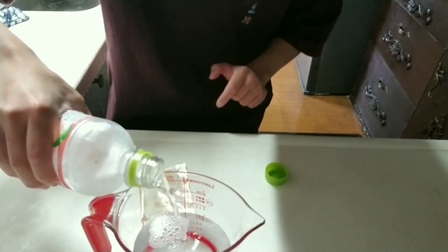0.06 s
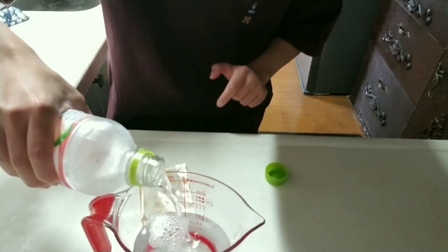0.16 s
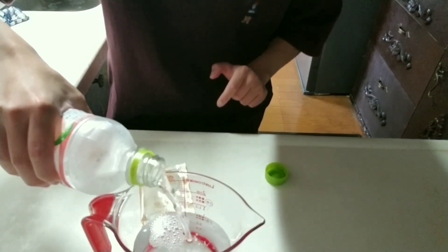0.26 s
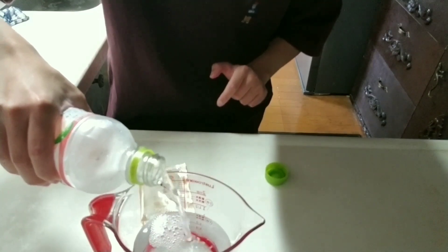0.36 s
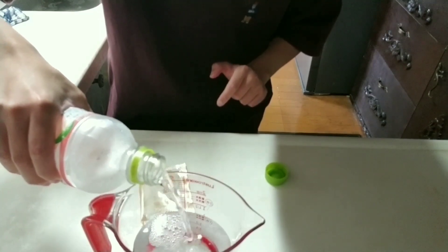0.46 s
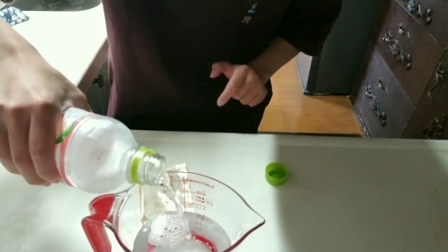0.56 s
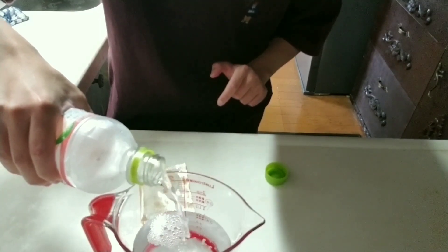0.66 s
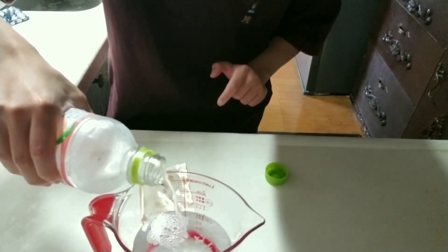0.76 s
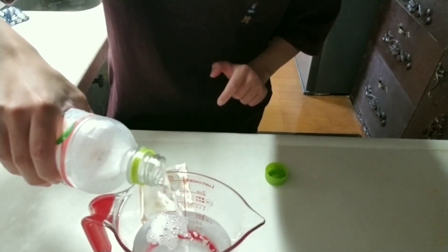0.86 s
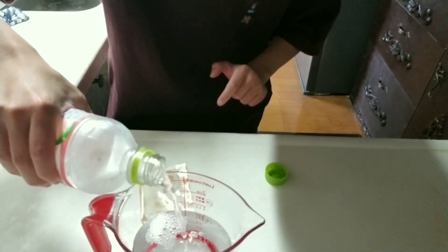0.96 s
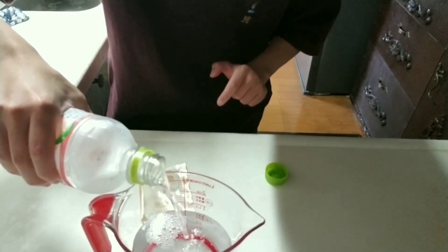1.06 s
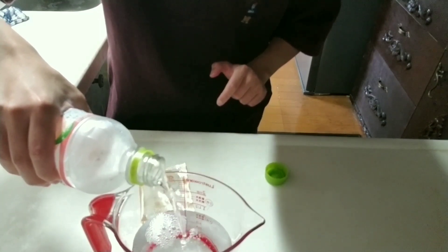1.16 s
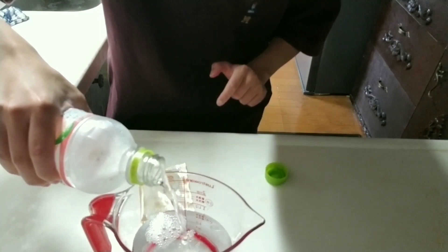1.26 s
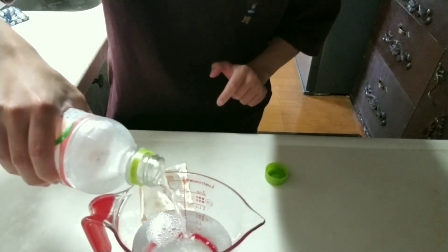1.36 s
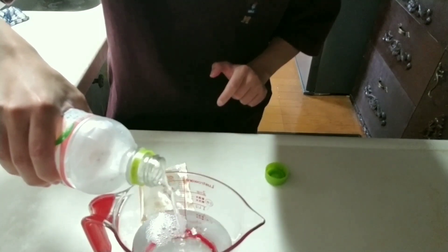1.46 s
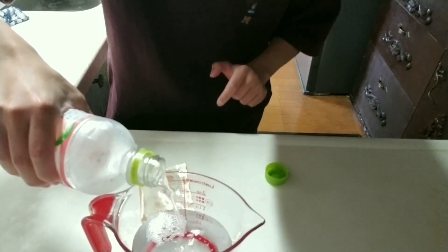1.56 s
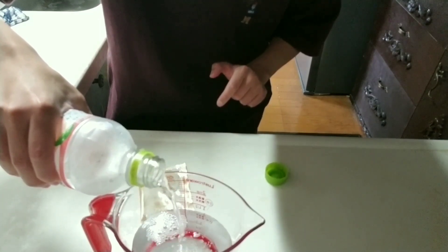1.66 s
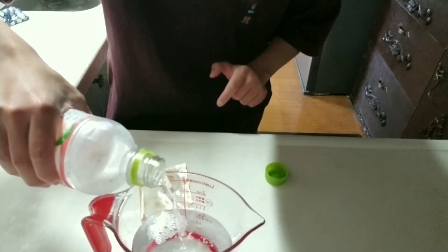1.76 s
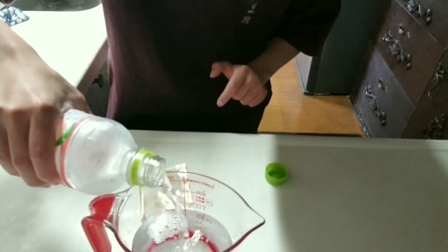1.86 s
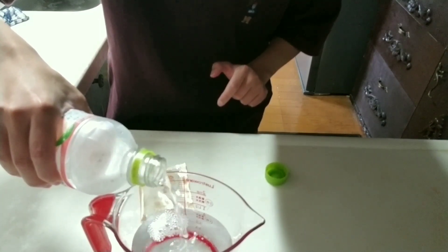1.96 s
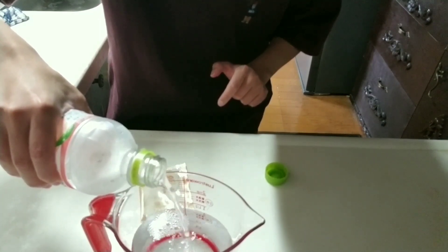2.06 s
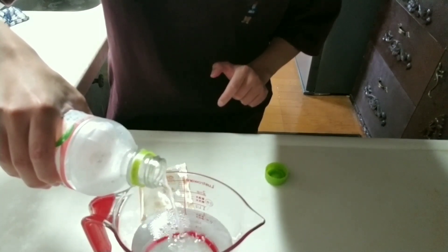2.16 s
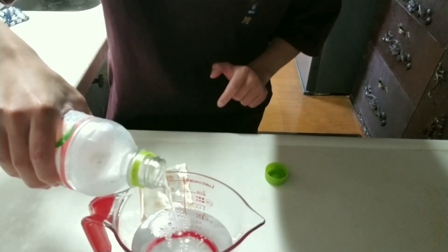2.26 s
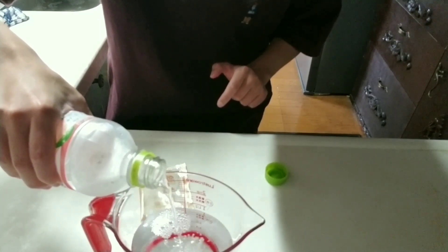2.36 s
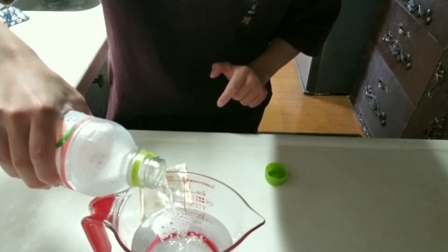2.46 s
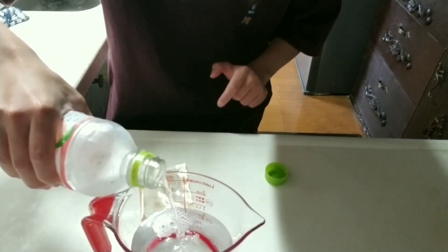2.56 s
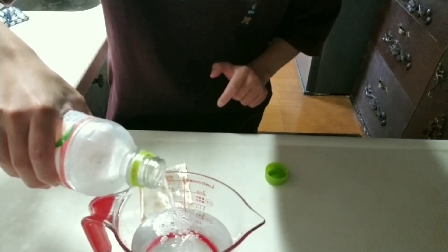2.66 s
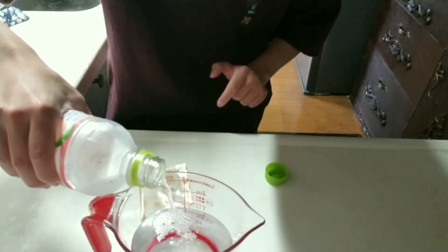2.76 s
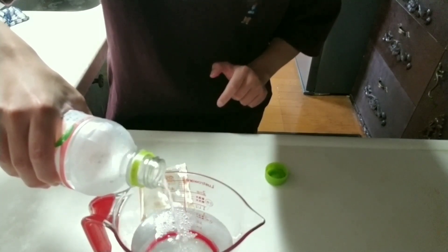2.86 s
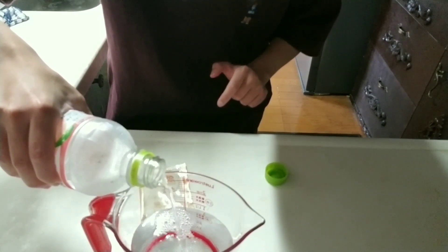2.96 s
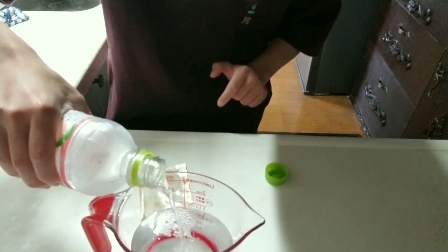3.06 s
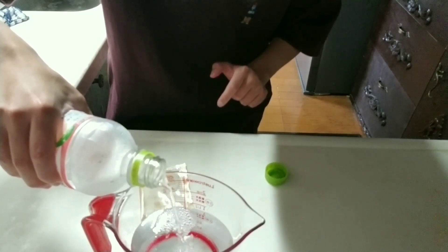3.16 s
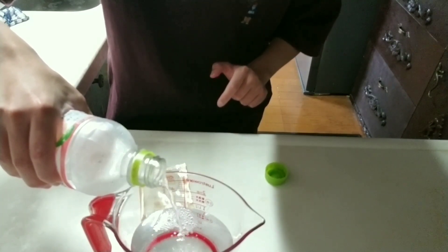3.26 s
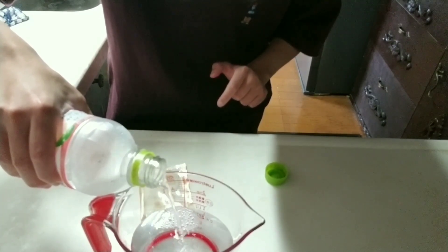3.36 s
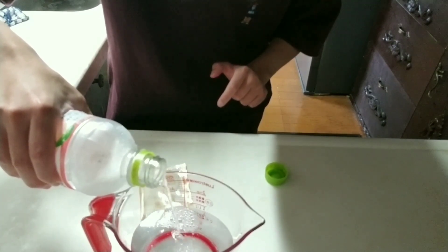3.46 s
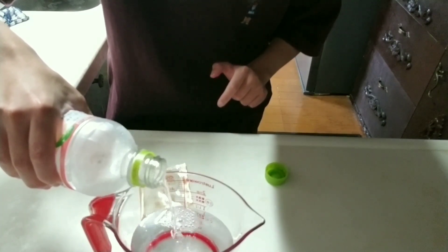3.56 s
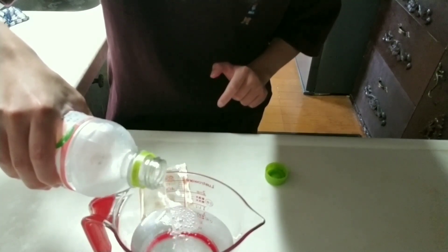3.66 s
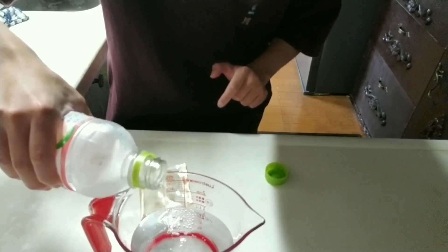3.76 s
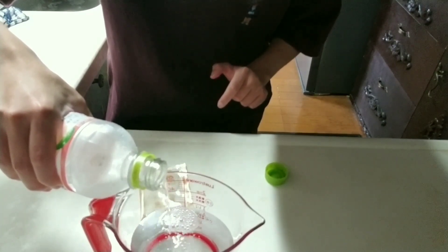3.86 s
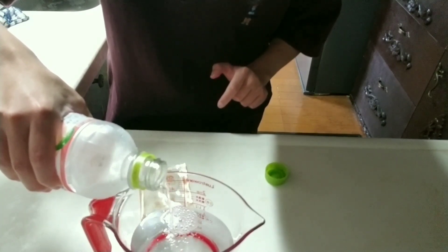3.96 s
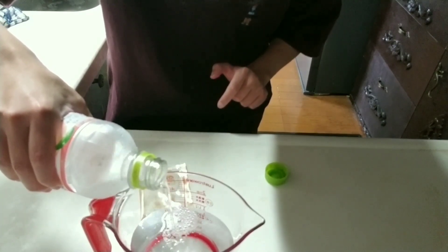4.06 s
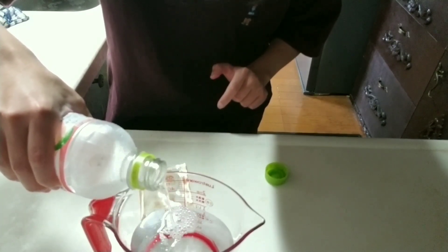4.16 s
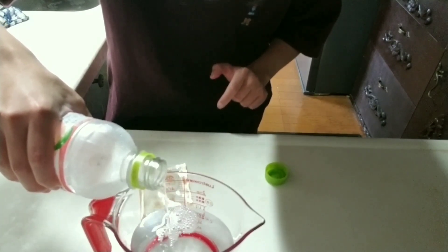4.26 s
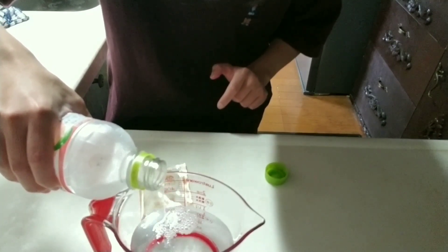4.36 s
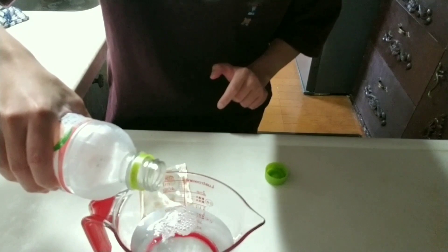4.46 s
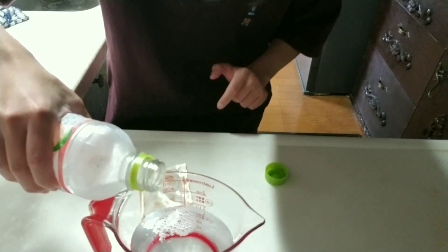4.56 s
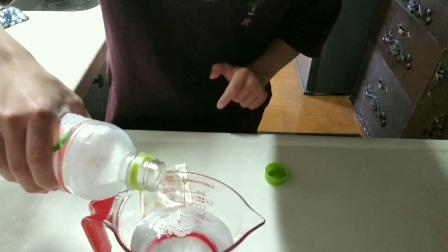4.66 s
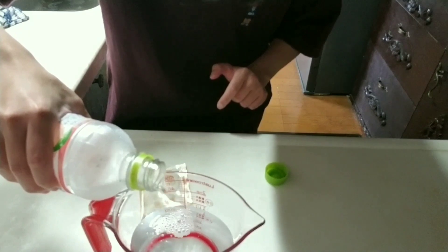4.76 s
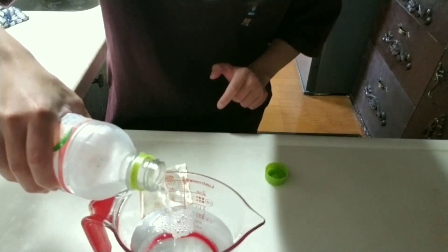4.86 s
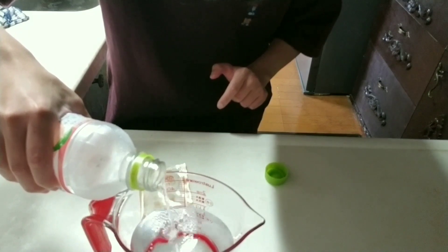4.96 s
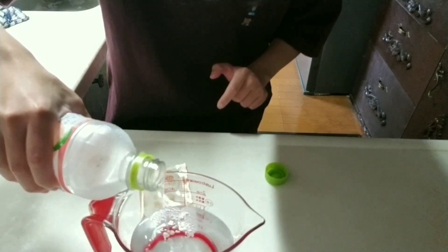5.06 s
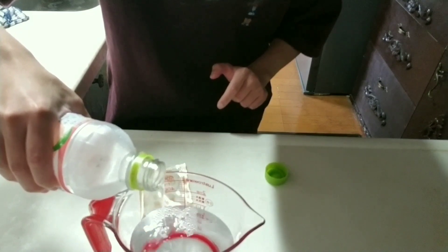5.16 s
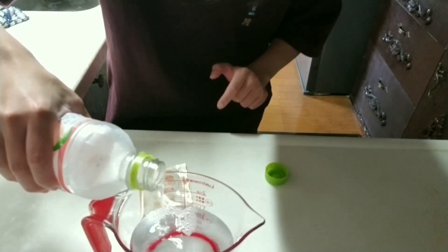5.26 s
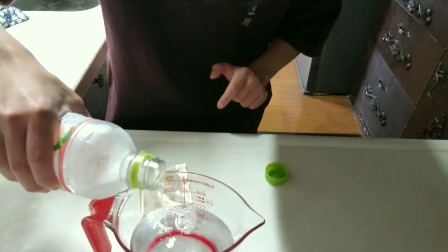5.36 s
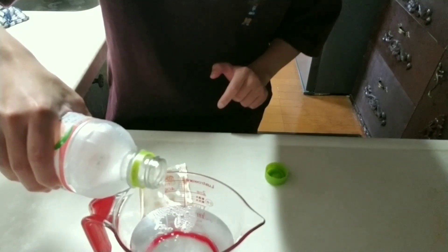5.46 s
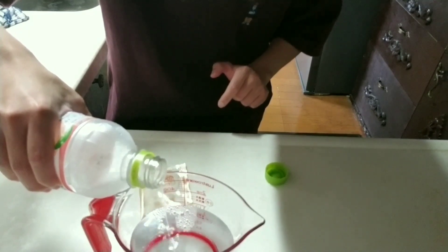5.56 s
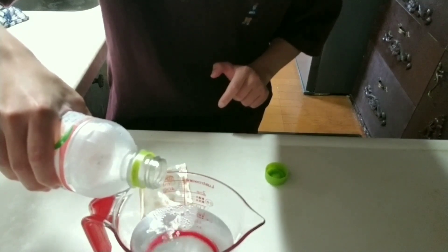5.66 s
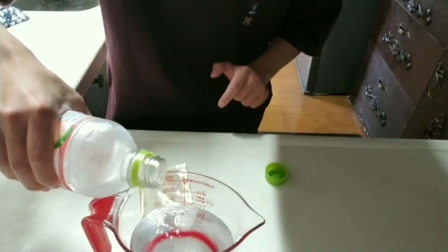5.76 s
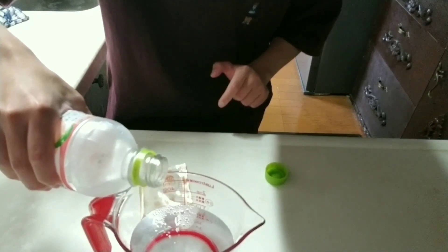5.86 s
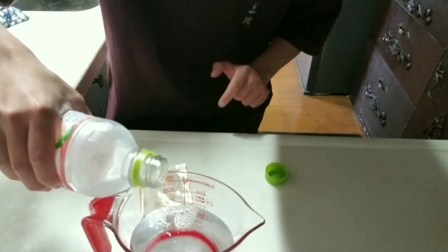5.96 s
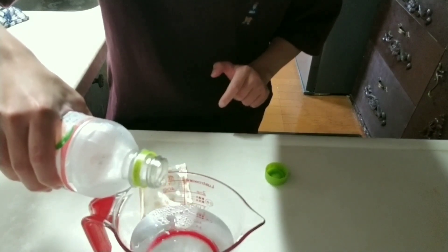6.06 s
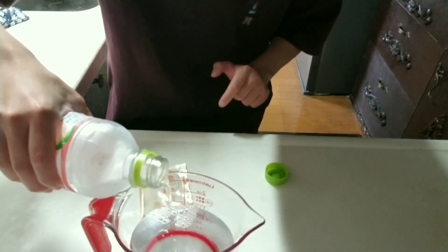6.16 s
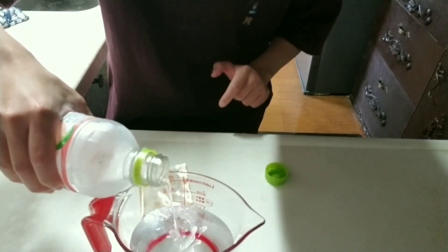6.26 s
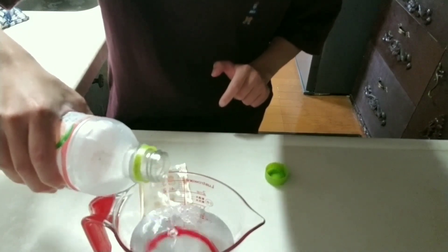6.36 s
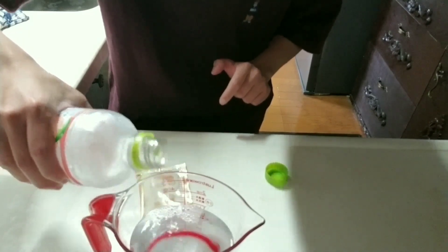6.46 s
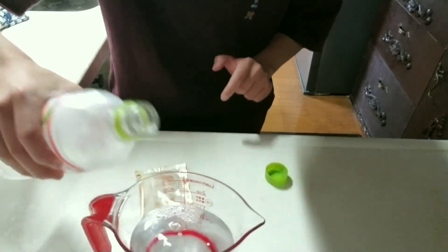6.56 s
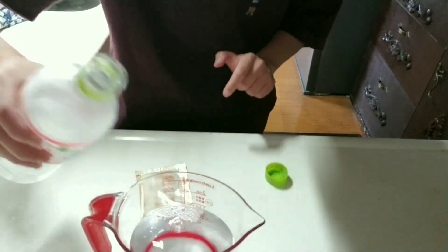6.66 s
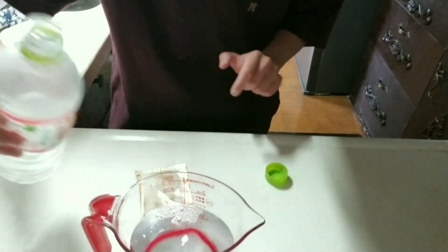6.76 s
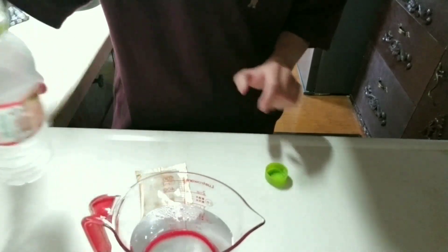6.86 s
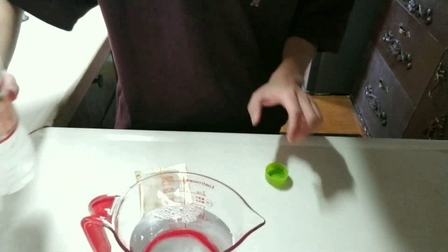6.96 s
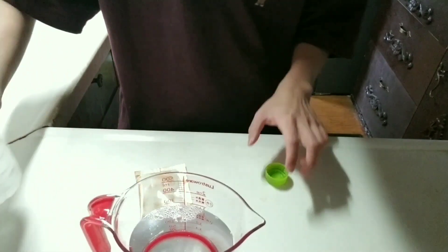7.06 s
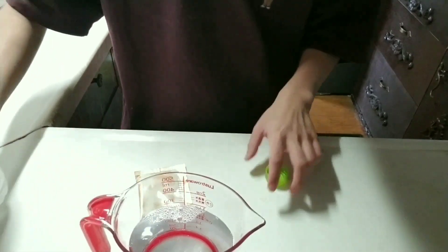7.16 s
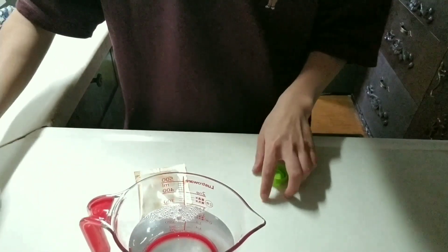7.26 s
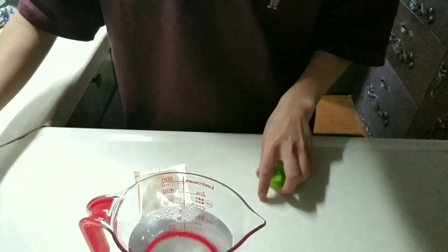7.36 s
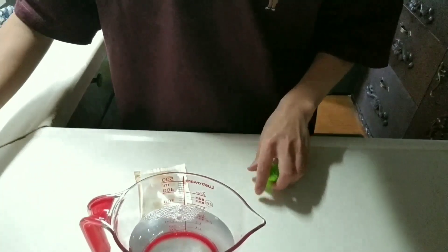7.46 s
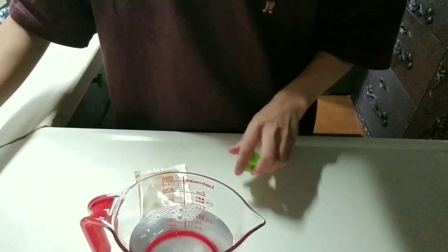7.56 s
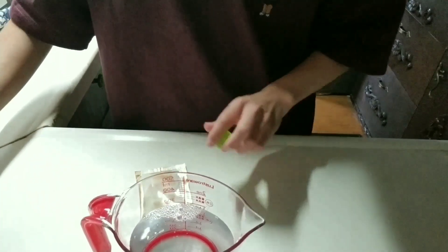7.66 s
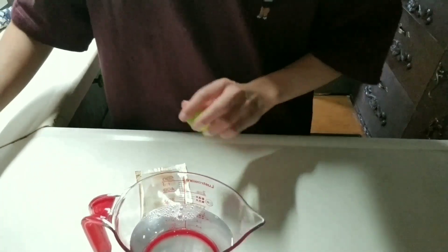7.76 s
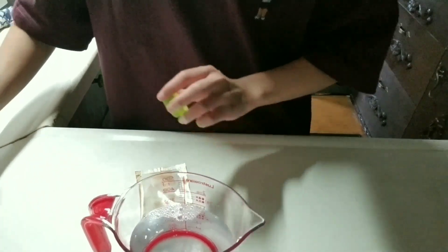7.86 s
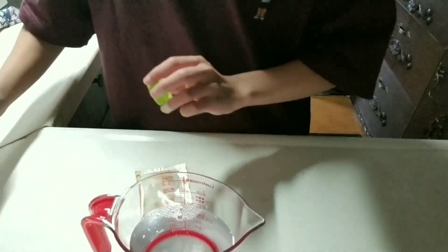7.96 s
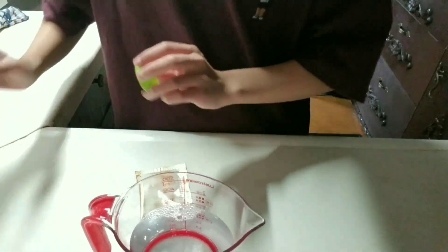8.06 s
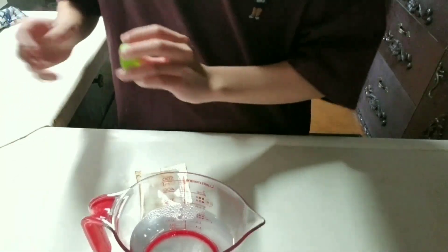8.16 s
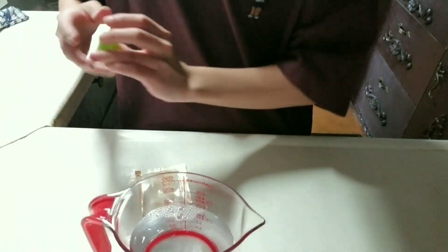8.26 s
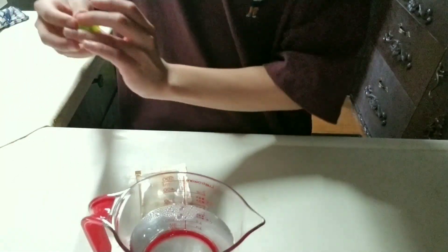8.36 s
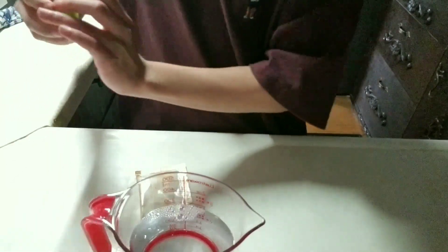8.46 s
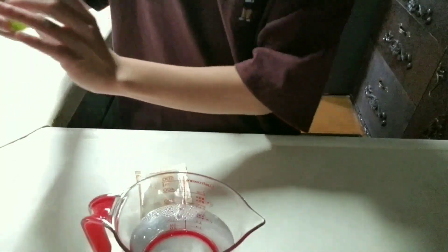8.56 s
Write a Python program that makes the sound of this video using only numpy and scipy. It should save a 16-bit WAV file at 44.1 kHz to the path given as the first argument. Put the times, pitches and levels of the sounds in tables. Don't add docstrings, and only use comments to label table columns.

```python
import sys
import numpy as np
from scipy import signal
from scipy.fft import rfft, irfft, next_fast_len
from scipy.io import wavfile
from scipy.ndimage import uniform_filter1d

SR = 44100
rng = np.random.default_rng(int(sys.argv[2]) if len(sys.argv) > 2 else 0)


def invert_db(level):
    return 10 ** (np.asarray(level, dtype=float) / 20)


def inscribe(sig):
    pcm = np.round(np.clip(np.atleast_2d(sig).T, -1, 1) * 32767)
    wavfile.write(sys.argv[1], SR, pcm.astype(np.int16))


N = 380141
PADDED = next_fast_len(N)

# pitch_hz, density_db (per Hz)
RUMBLE_SPECTRUM = [(12, -44), (20, -8.5), (110, 0), (168, -10), (258, -5.5), (372, -18), (710, -19.5),
                   (1090, -29.5), (1350, -22), (1650, -32), (6900, -31.5), (8400, -35.5), (13000, -31),
                   (16500, -34)]
# pitch_hz, likeness (-1 to 1)
RUMBLE_LIKENESS = [(60, 0.88), (150, 0.88), (380, 0.6), (950, 0.16), (2380, -0.1), (5980, -0.17),
                   (15000, 0.11)]
# centre_hz, width_hz, level_db, likeness (-1 to 1), pan_db
SHELL_RESONANCES = [(108.85, 10.7, -47.5, 0.94, 2), (214.2, 10, -55.5, 0.89, 2.5),
                    (240.6, 23.5, -61.5, 0.78, 6), (1356, 41, -70, .1, 12)]
# time_s, level_db
LOW_SWAY = [
    (0, -2),
    (1.2, 1),
    (3, 3),
    (4, -10.5),
    (4.8, 6),
    (5.8, 0.5),
    (6.5, 8.5),
    (7, -11),
    (8.62, 0),
]
# pitch_hz, left_db, right_db, left_lead_rad
WHINE_LINES = [(1384.4, -46, -51, 2.89), (1334.8, -57, -62, 1.5), (716, -61, -83, 0.58),
               (742, -67.5, -75, 1.2), (1656, -73.5, -78, 1.1)]
# low_hz, high_hz, t60_s, level_db
ECHO_BANDS = [(30, 240, 0.33, -29), (195, 1050, 0.18, -6), (1200, 3130, 0.2, -10),
              (4000, 7700, 0.24, -10.5), (9000, 16000, 0.17, -9)]

# start_s, length_s, peak_db
CAP_SLIDES = [
    (7.1, 0.1, -44),
    (7.23, .3, -43),
    (7.545, .04, -27),
    (7.578, .075, -19),
    (7.65, .055, -27),
    (7.71, .055, -29),
    (7.768, .085, -20),
    (7.85, .07, -32),
]
# start_s, length_s, peak_db
FOOT_RUBS = [
    (7.11, .12, -33),
    (7.235, .11, -37),
    (7.34, .07, -39),
    (7.4, 0.24, -36),
    (7.6, 0.15, -36),
    (7.78, .11, -39),
]
# pitch_hz, density_db (per Hz)
RASP_SPECTRUM = [(710, -47), (1200, -29), (1800, -20), (2610, 9.5), (6790, -5), (12800, -0.5), (15300, 1),
                 (16500, -33)]
# pitch_hz, density_db (per Hz)
RUB_SPECTRUM = [(350, 0.5), (500, 4), (1000, -8), (2500, -15.5), (5000, -26.5)]

# start_s, boom_db, panel_db, bottle_db, contact_s
COUNTER_KNOCKS = [(4.222, -50, -25.5, -52, 0.0038), (7.1225, -49, -44, -5, 0.0025),
                  (7.154, -46, -37, -23, 0.0011), (7.2373, -19, -8, -10, 0.00086),
                  (7.2443, -11, -16, 5, .0025), (7.282, -39, -15, -15, 0.0026),
                  (7.3045, -32, -22, -15, 0.0015), (7.343, -16, -2.5, -39, 0.004),
                  (7.351, -18, -15, -8, 0.00072), (7.4, -6, -22, -9.5, 0.0018), (7.425, -7, -16, -15, .002),
                  (7.446, -4.5, -13, -14, 0.0029), (7.49, -20, -19, -24, 0.0018),
                  (7.569, -17, -31, -28, 0.0016), (7.673, -23.5, -24, -17, 0.0022),
                  (7.789, -32, -29, -30.5, 0.0034), (7.851, -54, -35, -30, 0.00092),
                  (8.04, -47, -25.5, -53, 0.0017)]
# pitch_hz, level_db, t60_s
CABINET_MODES = [(45, -24, 0.099), (74, 1, 0.255), (108.3, -2.5, 0.23), (125, -21, 0.17)]
# pitch_hz, level_db, t60_s
PANEL_MODES = [(191.7, -9.5, 0.051), (216.7, -2.5, 0.18)]
# pitch_hz, level_db, t60_s
BOTTLE_MODES = [(272, -13, 0.11), (304.3, 1, 0.11), (340, -23, 0.062), (567, -19, .07), (740, -29, 0.089)]
# pitch_hz, width_hz
KNOCK_DIPS = [(158, 45), (410, 130)]

# start_s, peak_db, centre_oct (above 1 kHz), pan_db
PLASTIC_CRACKS = [(4.885, -13.5, 4.1, 4), (6.408, -29, 3.8, .3), (6.554, -9.5, 3.16, 4),
                  (6.764, -31, 3.2, 3), (6.8965, -1.5, 2.75, -4), (7.118, -8, 1.3, 1), (7.123, -21, .9, -5),
                  (7.149, -23, .6, 8), (7.2385, -20, 1.3, 2), (7.256, -17.5, 2.37, 1.1),
                  (7.359, -28, 1.7, -1), (7.489, -27.5, 1.3, .3), (7.546, -20.5, 2.8, -3),
                  (7.559, -11, 2.64, -5), (7.5835, -5, 3.1, -3.5), (7.5915, -3.5, 2.5, -2),
                  (7.596, -10, 4.1, .3), (7.606, -9, 2.4, .3), (7.6535, -10, 2.6, 6),
                  (7.662, -15, 2.75, -3), (7.713, -6.5, 2.77, -5), (7.7295, -4, 3.5, -3),
                  (7.7425, -8, 3.3, 4), (7.7765, -13, 2.7, .3), (7.795, -12, 2.6, 0),
                  (7.806, -3.5, 3.8, -3), (7.851, -5, 3.16, -7), (7.919, -26, 2.3, 2)]
# low_hz, high_hz, t60_s
CRACK_LAYERS = [(533, 930, 0.061), (1300, 2530, 0.047), (2500, 6350, 0.037), (6800, 14560, 0.023)]
# pitch_hz, level_db, t60_s
CAP_MODES = [(969, -6, .07), (1400, -1.5, .045), (1610, -4, .07), (1943, -4, .07), (2153, -1.5, .08),
             (2702, -9, .06)]
# start_s, level_db
CAP_KNOCKS = [
    (7.1185, -22),
    (7.15, -29),
]

# time_s, level_db
STREAM_VIGOUR = [(0, -50.5), (.7, -52.5), (1.15, -49.5), (1.76, -49), (2.0, -52.5), (2.45, -57),
                 (2.68, -50.5), (3.16, -60), (3.35, -56), (3.66, -65), (4.14, -62), (4.39, -45.5),
                 (4.64, -66), (5.04, -51), (5.23, -60), (5.9, -76), (6.4, -55), (6.88, -50)]
# start_s, length_s, peak_db, low_hz, high_hz
SPRAY_GUSHES = [
    (2.677, 0.046, -49, 1920, 2920),
    (2.746, 0.023, -44.5, 1500, 5000),
    (4.3, 0.087, -53, 4000, 10100),
    (4.436, 0.099, -47, 2200, 9000),
    (4.917, .11, -46, 1890, 5960),
    (5.519, 0.13, -54, 3030, 6530),
    (5.636, 0.095, -53.5, 2160, 4470),
    (6.272, 0.062, -56, 1970, 3200),
    (6.43, 0.035, -41.5, 2500, 5250),
    (6.765, 0.1, -47, 3480, 12000),
]
# start_s, level_db
DROP_TICKS = [(.1087, -26), (.8066, -28), (.8584, -23), (1.127, -19), (1.2024, -27), (1.252, -24),
              (1.5399, -20), (1.577, -16.5), (1.6267, -22), (1.662, -24), (1.74, -36), (1.948, -30),
              (2.4316, -22), (3.1349, -29), (3.2464, -31), (3.49, -24), (4.3095, -23), (4.3406, -23),
              (4.4632, -23), (4.9275, -10.5), (4.959, -23), (5.101, -23), (5.3194, -26), (5.659, -28),
              (6.226, -28), (6.2751, -25), (6.419, -8), (6.448, -18), (6.469, -22), (6.7903, -26)]
# start_s, level_db, pitch_hz
TRAPPED_BUBBLES = [(.1087, -48, 3240), (.2224, -48.5, 2790), (.7093, -48, 2740), (0.736, -40.5, 2790),
                   (.786, -44, 3100), (.8584, -36.5, 2760), (0.914, -47, 2770), (1.168, -32, 2770),
                   (1.3234, -38, 2800), (1.3673, -34.5, 2880), (1.439, -48, 3150), (1.5405, -34, 1700),
                   (1.6267, -41, 2630), (1.739, -48, 2740), (1.7948, -45, 2180), (1.949, -37, 2790),
                   (2.4316, -37, 2460), (2.667, -37, 1710), (2.685, -38.5, 1690), (3.1353, -40, 3200),
                   (3.302, -47, 2340), (3.4906, -33.5, 3060), (3.509, -41, 1930), (4.4629, -32.5, 2770),
                   (4.4955, -32.5, 2310), (4.959, -40, 2470), (5.562, -47, 3230), (5.659, -39.5, 2840),
                   (6.4306, -42, 3320), (6.448, -18.5, 3230),
                   (.52, -42, 6980), (1.128, -40, 4060), (1.168, -24.5, 4750), (1.252, -46, 5330),
                 (1.2897, -38, 7100), (1.3676, -42, 3400), (1.577, -43, 7520), (1.6267, -31.5, 6970),
                 (1.662, -38, 3530), (1.8534, -41, 3680), (2.0294, -44, 4800), (2.217, -48, 4800),
                 (2.4318, -36, 7640), (2.456, -40.5, 3510), (2.743, -33, 7250), (3.1346, -43, 3380),
                 (3.4264, -45, 4840), (3.49, -41, 3420), (4.1337, -36, 7400), (4.1874, -44, 6900),
                 (4.341, -36, 7560), (4.4244, -44, 5040), (4.4632, -47, 7200), (4.9274, -32, 4000),
                 (5.5143, -41, 5500), (5.562, -45, 4850), (6.4303, -31, 4750), (6.448, -27, 3230),
                 (6.469, -31, 4560), (6.7903, -44, 3900)]
# start_s, peak_db, pitch_hz, rise (share of pitch), t60_s
BIG_GLUGS = [(.842, -49, 2166, .01, .2), (2.69, -42, 2150, .25, .08), (4.933, -15.5, 1333, 0.016, 0.055),
             (4.958, -28.5, 1200, .034, .044), (4.996, -40, 1960, 0.048, .061),
             (5.042, -21.5, 1300, 0.052, .09), (5.05, -46, 2550, .02, .12),
             (5.059, -24.5, 1390, 0.022, .032), (6.271, -31, 1140, .09, .13),
             (6.35, -30.5, 1300, 0.32, .052), (6.364, -42, 1500, 2.8, 0.041),
             (8.118, -29, 1300, .056, 0.031)]


def rms_one(x):
    return x / np.sqrt(np.mean(x ** 2) + 1e-20)


def in_time(rows):
    times, levels = np.transpose(rows)
    return np.interp(np.arange(N) / SR, times, levels, left=-120, right=-120)


def at_hz(points, hz):
    point_hz, values = np.transpose(points)
    return np.interp(np.log(hz), np.log(point_hz), values)


def band(x, low_hz, high_hz):
    sections = signal.butter(2, [low_hz, min(high_hz, 0.45 * SR)], "band", fs=SR, output="sos")
    return signal.sosfilt(sections, x)


def shaped(x, gain):
    hz = np.maximum(np.fft.rfftfreq(PADDED, 1 / SR), 1)
    return irfft(rfft(x, PADDED) * gain(hz), PADDED)[..., :N]


def coloured(white, spectrum):
    return rms_one(shaped(white, lambda hz: invert_db(at_hz(spectrum, hz))))


def drift(rate_hz):
    r = np.exp(-80 * np.pi * rate_hz / SR)
    slow = signal.lfilter([1], [1, -2 * r, r * r], rng.standard_normal(N // 40 + 2002))
    slow = rms_one(slow[2000:])
    return np.interp(np.arange(N) / 40, np.arange(len(slow)), slow)


def add(out, start_s, sound):
    i = round(start_s * SR)
    room = out.shape[-1] - i
    out[..., i:i + sound.shape[-1]] += sound[..., :room]


def panned(pan_db):
    return np.array([[pan_db / 2], [-pan_db / 2]])


def pair(x, pan_db, lag):
    left = np.roll(x, max(lag, 0))
    right = np.roll(x, max(-lag, 0))
    return np.array([left, right]) * invert_db(panned(pan_db))


def burst(low_hz, high_hz, t60, channels=1):
    t = np.arange(2500) / SR
    puff = band(rng.standard_normal((channels, 2500)) * invert_db(-60 * t / t60), low_hz, high_hz)
    return puff / np.abs(puff).max(axis=1, keepdims=True)


def click(low_hz, high_hz):
    push = band(np.eye(1, 2500)[0], low_hz, high_hz)
    return push / np.abs(push).max()


def refrigerator():
    mid, side = rng.standard_normal((2, N))
    mid = shaped(mid, lambda hz: np.sqrt(1 + at_hz(RUMBLE_LIKENESS, hz)))
    side = shaped(side, lambda hz: np.sqrt(1 - at_hz(RUMBLE_LIKENESS, hz)))
    out = invert_db(-40.5) * coloured(np.array([mid + side, mid - side]), RUMBLE_SPECTRUM)

    sway, white = invert_db(in_time(LOW_SWAY)), rng.standard_normal((2, N))
    for centre_hz, width_hz, level_db, likeness, pan_db in SHELL_RESONANCES:
        mid, side = rms_one(band(white, centre_hz - width_hz / 2, centre_hz + width_hz / 2))
        both = np.sqrt((1 + likeness) / 2) * mid + np.sqrt((1 - likeness) / 2) * side * [[1], [-1]]
        standing = sway if centre_hz < 400 else 1
        out += invert_db(level_db + panned(pan_db)) * both * standing

    t = np.arange(N) / SR
    for line_hz, left_db, right_db, lead in WHINE_LINES:
        line = np.sin(2 * np.pi * line_hz * t + np.array([[lead], [0]]))
        out += np.sqrt(2) * invert_db([[left_db], [right_db]]) * line
    return out


def sag(snaps):
    threshold_db, share, recover_db_per_s = -24, 0.16, 10
    power = uniform_filter1d(np.mean(snaps ** 2, axis=0), size=256)
    level_db = 10 * np.log10(power.clip(1e-12))
    drop_db = share * np.clip(level_db - threshold_db, 0, None)
    climb_db = recover_db_per_s * np.arange(N) / SR
    return invert_db(climb_db - np.maximum.accumulate(drop_db + climb_db))


def kitchen(x):
    t = np.arange(SR // 2) / SR
    echoes = np.zeros((2, len(t)))
    for low_hz, high_hz, t60, level_db in ECHO_BANDS:
        echoes += invert_db(level_db - 60 * t / t60) * band(rng.standard_normal((2, len(t))), low_hz, high_hz)
    echoes *= np.clip(t / 0.0012, 0, 1) / np.sqrt(0.0013 * SR)
    return signal.fftconvolve(x[None], echoes, axes=1)[:, :N]


def strokes(rows):
    out = np.zeros(N)
    for start_s, length_s, peak_db in rows:
        t = np.arange(int(length_s * SR)) / (length_s * SR)
        add(out, start_s, invert_db(peak_db) * np.sin(np.pi * t ** 0.55) ** 2)
    return out


def drag():
    slips = rng.standard_normal((2, N)) * invert_db(6.5 * drift(92))
    rasp = invert_db(-5.5) * strokes(CAP_SLIDES) * coloured(slips, RASP_SPECTRUM)
    rub = strokes(FOOT_RUBS) * coloured(slips[0, ::-1], RUB_SPECTRUM)
    return rasp + rub


def knocks():
    out, t = np.zeros(N), np.arange(SR // 3) / SR
    for start_s, *levels_db, contact_s in COUNTER_KNOCKS:
        swell = (1 - np.exp(-t / contact_s)) ** 2
        for level_db, body in zip(levels_db, (CABINET_MODES, PANEL_MODES, BOTTLE_MODES)):
            for hz, mode_db, t60 in body:
                ring = invert_db(level_db + mode_db - 60 * t / t60) * np.sin(2 * np.pi * hz * t)
                add(out, start_s, -swell * ring)
    for spot_hz, width_hz in KNOCK_DIPS:
        out = signal.lfilter(*signal.iirnotch(spot_hz, spot_hz / width_hz, SR), out)
    return band(out, 29, 5000)


def cap_taps():
    out, t = np.zeros(N), np.arange(SR // 5) / SR
    ring = sum(invert_db(mode_db - 60 * t / t60) * np.sin(2 * np.pi * hz * t) for hz, mode_db, t60 in CAP_MODES)
    for start_s, tap_db in CAP_KNOCKS:
        add(out, start_s, invert_db(tap_db) * ring)
    return out


def cracks():
    fall_db_per_oct = 10.5
    near, into_room = np.zeros((2, N)), np.zeros(N)
    for k, (low_hz, high_hz, t60) in enumerate(CRACK_LAYERS):
        push = (-1) ** k * click(low_hz, high_hz)
        puffs = burst(low_hz, high_hz, t60, channels=2 * len(PLASTIC_CRACKS))
        puffs = puffs.reshape(len(PLASTIC_CRACKS), 2, -1)
        band_octave = np.log2(np.sqrt(low_hz * high_hz) / 1000)
        for (start_s, peak_db, centre_octave, pan_db), puff in zip(PLASTIC_CRACKS, puffs):
            level_db = peak_db - fall_db_per_oct * abs(band_octave - centre_octave)
            snap = 0.9 * push + invert_db(-2.5) * puff
            add(near, start_s, snap * invert_db(level_db + panned(pan_db)))
            add(into_room, start_s, 1.71 * invert_db(level_db) * push)
    return near, into_room


def grains(per_s, spread_db):
    born = rng.random(N) < per_s * invert_db(5 * drift(15)) / SR
    strength = invert_db(spread_db * np.minimum(rng.exponential(1, N), 5))
    return born * strength * rng.choice([-1, 1], N)


def fizz(vigour_db):
    return invert_db(vigour_db - 4) * rms_one(band(grains(1500, 5.4), 4400, 23000))


def babble(vigour_db):
    clicks, dealt = grains(200, 4.2), rng.integers(0, 6, N)
    out = np.zeros(N)
    for k, hz in enumerate(np.geomspace(1800, 4500, num=6)):
        out += band(clicks * (dealt == k) + 1e-18, hz / 1.04, hz * 1.04)
    return invert_db(-75 + 0.95 * (vigour_db + 57)) * rms_one(out)


def spray():
    out = np.zeros(N)
    for start_s, length_s, peak_db, low_hz, high_hz in SPRAY_GUSHES:
        t = np.arange(int(length_s * SR)) / (length_s * SR)
        drops = rng.standard_normal(6000) * invert_db(2.5 * rng.exponential(1, 6000))
        hiss = rms_one(band(drops, low_hz, high_hz))[:len(t)]
        add(out, start_s, invert_db(peak_db) * np.sin(np.pi * t ** 0.48) ** 2 * hiss)
    return out


def bubble(level_db, hz, rise, t60, swell):
    t = np.arange(int(t60 * SR) + 2) / SR
    phase = 2 * np.pi * hz * (t + rise * t ** 2 / t60)
    return invert_db(level_db - 60 * t / t60) * (1 - np.exp(-t / swell)) * np.sin(phase)


def cluster(level_db, hz, luck):
    out = np.zeros(3000)
    add(out, 0, bubble(level_db + 9, hz, rise=0.016, t60=55 / hz, swell=0.00025))
    add(out, 0, invert_db(level_db - 4) * burst(hz / 1.3, hz * 1.3, 70 / hz)[0])
    for late, pitch, size in luck:
        near_hz = hz * 1.6 ** (pitch - 0.45)
        neighbour = bubble(level_db - 1 - 9 * size, near_hz, rise=0.048, t60=35 / hz, swell=0.00049)
        add(out, 0.037 * late, neighbour)
    return out


def water():
    vigour_db = in_time(STREAM_VIGOUR)
    out = spray() + fizz(vigour_db) + babble(vigour_db)
    bubbles = TRAPPED_BUBBLES
    for (start_s, level_db, hz), luck in zip(bubbles, rng.random((len(bubbles), 4, 3))):
        add(out, start_s, cluster(level_db - 4, hz, luck))
    tick = click(8500, 16500)
    for start_s, tick_db in DROP_TICKS:
        add(out, start_s, invert_db(tick_db) * tick)
    for start_s, peak_db, hz, rise, t60 in BIG_GLUGS:
        add(out, start_s, bubble(peak_db, hz, rise, t60, swell=0.056 * t60))
    return out


def scene():
    wet, rubbing, blows = water(), drag(), knocks()
    snaps, echoing = cracks()
    snaps = snaps + cap_taps()
    near = pair(wet, 2.5, lag=-1) + snaps + rubbing + pair(blows, -0.8, lag=14)
    echoes = kitchen(0.55 * wet + echoing + 0.65 * rubbing[0] + 0.13 * blows)
    return near + echoes + sag(snaps) * refrigerator()


def band_limit(x):
    return signal.sosfilt(signal.butter(12, 16810, fs=SR, output="sos"), x)


def record(dry):
    clipped = shaped(np.clip(dry, -1, 1), lambda hz: hz < 16800)
    top = shaped(clipped, lambda hz: hz > 15530)
    opens_db = -42
    strength = uniform_filter1d(np.mean(top ** 2, axis=0), size=512) / invert_db(opens_db) ** 2
    mix = clipped - top * np.clip(2 - 2 * strength, 0, 1)
    return band_limit(mix)


dry = scene()
out = record(dry)
inscribe(out)
```